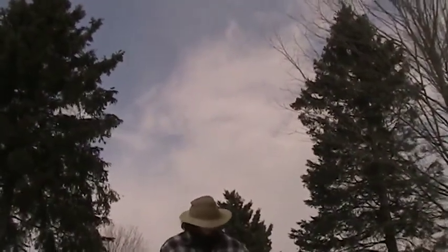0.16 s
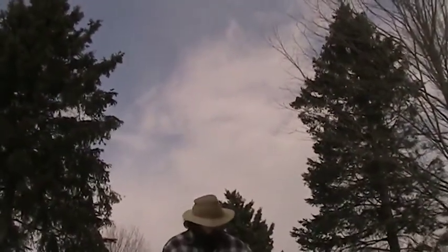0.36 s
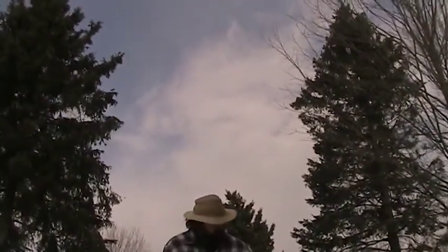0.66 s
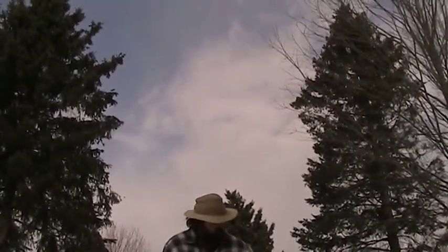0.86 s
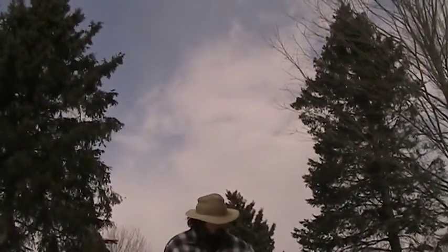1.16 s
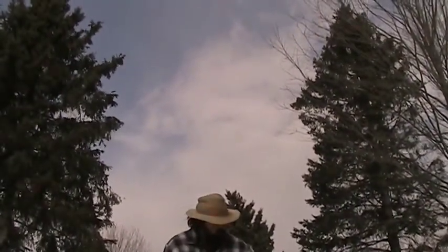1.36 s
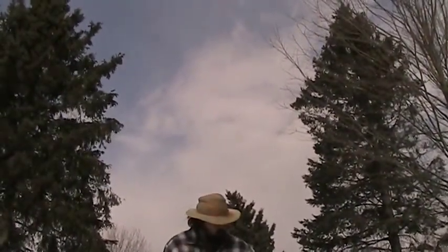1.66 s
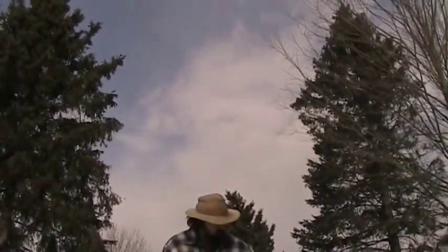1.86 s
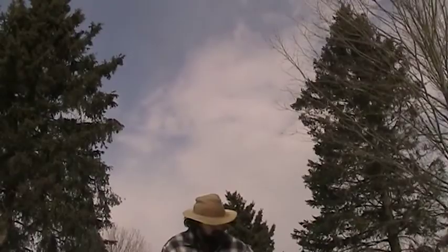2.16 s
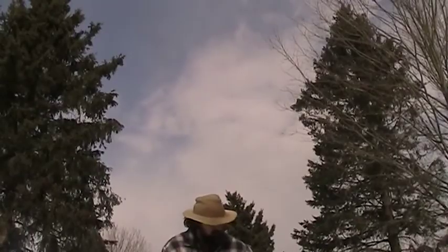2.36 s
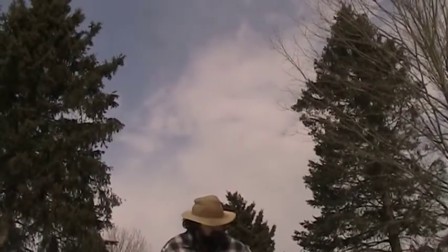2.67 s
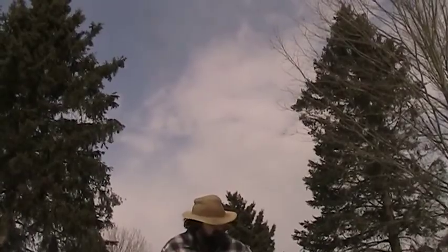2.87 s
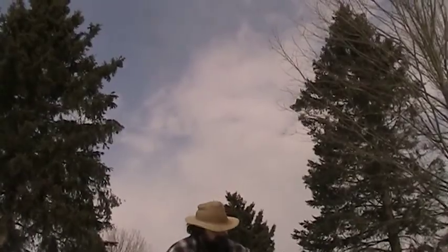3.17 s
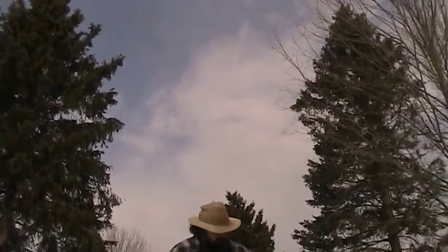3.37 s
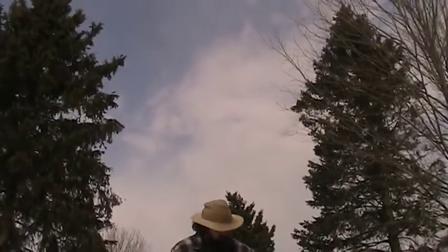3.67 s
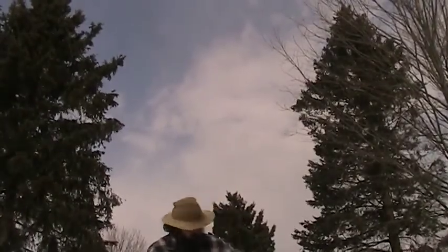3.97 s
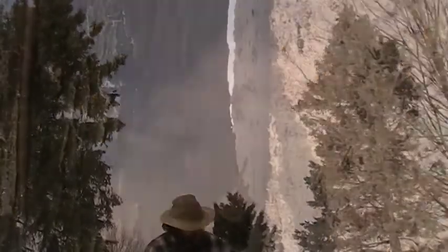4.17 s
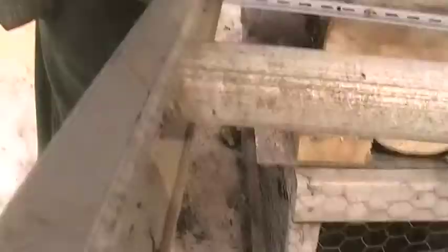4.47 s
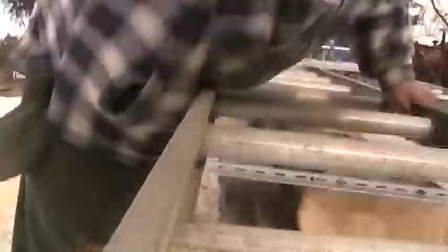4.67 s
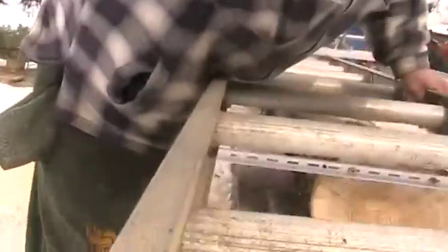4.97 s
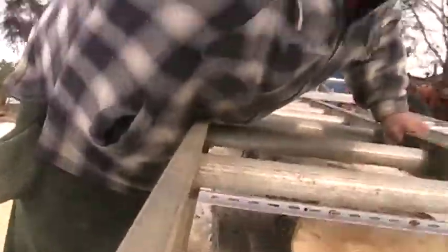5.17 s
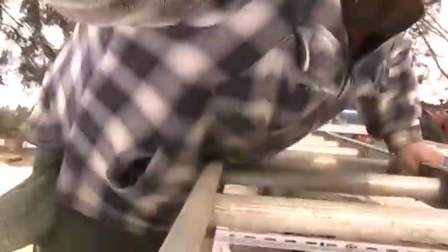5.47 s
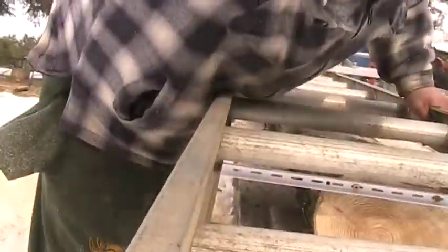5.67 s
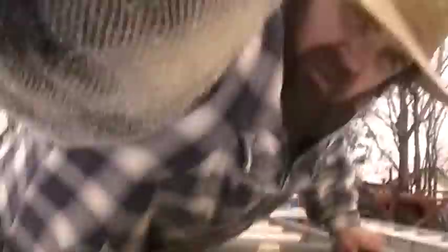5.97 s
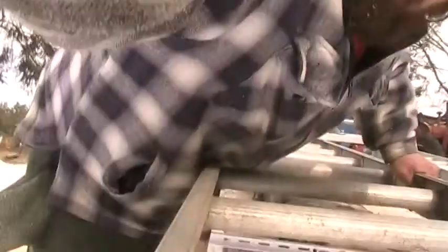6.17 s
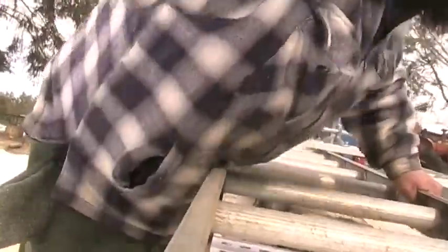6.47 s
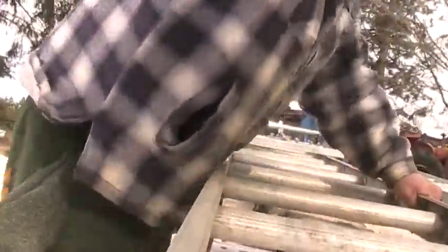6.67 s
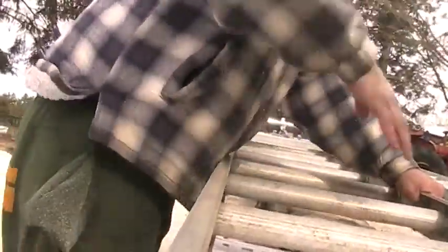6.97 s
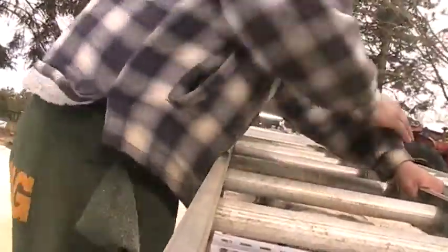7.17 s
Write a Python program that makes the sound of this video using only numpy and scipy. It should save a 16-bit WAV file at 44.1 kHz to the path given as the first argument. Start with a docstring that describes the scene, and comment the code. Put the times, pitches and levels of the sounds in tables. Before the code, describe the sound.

A two-stroke chainsaw revs up, labours through wood, is blipped several times, then putters steadily close by.

```python
"""An outdoor log mill. A two-stroke chainsaw revs up, labours in the wood, is blipped and runs down.
The scene cuts, with two short stutters, to a place right beside the saw, puttering at a steady low speed;
a dull bump and a light tick are heard. The exhaust is a source-filter system: each firing is a pulse
that excites the resonances of pipe and muffler. Chain and cooling air give broadband noise modulated
at the crank rate, and the chain drives the guide bar into resonance."""
import sys
import numpy as np
from scipy import signal
from scipy.fft import rfft, irfft, next_fast_len
from scipy.io import wavfile
from scipy.ndimage import uniform_filter1d, map_coordinates

SR = 44100
rng = np.random.default_rng(int(sys.argv[2]) if len(sys.argv) > 2 else 0)


def file_out(sig):
    """Save sig as 16-bit WAV at sys.argv[1]."""
    # one column per channel
    cols = np.atleast_2d(sig).T
    # limit, then scale
    lim = np.clip(cols, -1, 1)
    pcm = np.round(lim * 32767).astype(np.int16)
    wavfile.write(sys.argv[1], SR, pcm)


N = 322812
TIME = np.arange(N) / SR
TOP_HZ = 15800

def amp(db):
    """Decibels to amplitude ratio."""
    return 10 ** (np.asarray(db) / 20)

def unit(x):
    """Normalisation to rms 1."""
    return x / np.sqrt(np.mean(x ** 2) + 1e-20)

def steady(x):
    """Normalisation to a running rms of 1."""
    power = uniform_filter1d(uniform_filter1d(x ** 2, size=900), size=700)
    return x / np.sqrt(np.abs(power) + 1e-12)

def along(points, hz):
    """Interpolation on a logarithmic frequency axis."""
    f, v = np.transpose(points)
    return np.interp(np.log(hz + 1), np.log(f + 1), v)

def curves(rows):
    """Linear interpolation in time of each column after the first."""
    times, *columns = np.transpose(rows)
    return [np.interp(TIME, times, column) for column in columns]

def wobble(rate):
    """Smooth random modulation, rate knots a second."""
    return map_coordinates(rng.standard_normal(int(N * rate / SR) + 4), [np.arange(N) * rate / SR])

def filtered(x, response):
    """Linear filtering: the spectrum times a frequency response."""
    size = next_fast_len(N + SR // 2)
    return irfft(rfft(x, size) * response(np.fft.rfftfreq(size, 1 / SR)), size)[..., :N]

def ring(x, colour, size=4096):
    """Convolution with a minimum-phase body of the given magnitude response."""
    cepstrum = irfft(np.log(amp(along(colour, np.fft.rfftfreq(size, 1 / SR)))))
    cepstrum[1:size // 2] *= 2
    cepstrum[size // 2 + 1:] = 0
    return signal.oaconvolve(x, irfft(np.exp(rfft(cepstrum))))[:N]

def pulses(at, sizes, count=8):
    """Band-limited impulses: windowed sincs at fractional sample positions."""
    taps = at.astype(int)[:, None] + np.arange(1 - count, count + 1)
    offset = taps - at[:, None]
    shape = np.sinc(offset) * np.cos(np.pi * offset / (2 * count)) ** 2
    return np.bincount(np.clip(taps, 0, N).ravel(), (sizes[:, None] * shape).ravel(), N + 1)[:N]

def pan(x, left_db):
    """Localisation by a level difference between the channels."""
    return x * amp(np.array([[left_db], [-left_db]]) / 2)

# the long pull at full throttle, slowed by the wood: (time [s], firing rate [Hz])
PULL_SPEED = [(0.0, 158), (0.04, 244), (0.07, 301.4), (0.11, 360), (0.15, 435.6), (0.19, 453),
              (0.55, 414.2), (0.68, 391), (0.86, 335.3), (1.08, 352.5), (1.17, 346), (1.4, 357.2),
              (1.53, 306.0), (1.62, 321.5), (1.75, 313), (1.83, 338), (1.98, 321.5), (2.11, 334),
              (2.26, 319), (2.37, 342), (2.58, 368), (2.73, 406.5), (2.91, 433), (2.96, 432)]
# throttle blips: (opening time [s], closing time [s], starting rate [Hz], rate reached [Hz])
THROTTLE_BLIPS = [(3.13, 3.198, 194, 292.6), (3.254, 3.335, 266.5, 389.4), (3.606, 3.707, 185, 274.3),
                  (3.801, 3.857, 210.5, 260.6), (3.979, 4.044, 184, 255.8), (4.123, 4.159, 197.8, 208),
                  (4.259, 4.319, 169.2, 236.6)]
RELEASE_S, FADE_S, GONE_S = 2.968, 4.19, 4.49  # the pull ends; the revving starts to fade; it is gone
def crank_speed(idle_hz=110.1, final_hz=167.3):
    """Frictional decay: after the pull and each blip the firing rate sinks exponentially towards idle."""
    def sink(until, low):
        log_excess = np.log([top - idle_hz, low - idle_hz])
        return idle_hz + np.exp(np.interp(TIME, [since, until], log_excess))
    speed, = curves(PULL_SPEED)
    since, top = RELEASE_S, PULL_SPEED[-1][1]
    for opens, shuts, low, reached in THROTTLE_BLIPS:
        speed = np.where(TIME >= since, sink(opens, low), speed)
        swing = np.sin(np.pi / 2 * np.clip((TIME - opens) / (shuts - opens), 0, 1)) ** 2
        speed = np.where(TIME >= opens, low + (reached - low) * swing, speed)
        since, top = shuts, reached
    return np.where(TIME >= since, sink(GONE_S, final_hz), speed)

def throttle(lead_s=0.0059):
    """Response lag: the throttle (1 open, 0 coasting) leads the crank in each blip."""
    ahead = TIME + lead_s
    blips = sum((ahead >= opens) & (ahead < shuts) for opens, shuts, *_ in THROTTLE_BLIPS)
    held = (TIME < RELEASE_S) + blips
    return uniform_filter1d(held.astype(float), size=900)

def firings(speed, align_s=0):
    """Two-stroke cycle, one firing a turn: crank turns and firing positions [samples], one at align_s."""
    turns = np.cumsum(speed) / SR
    turns = turns - turns[int(align_s * SR)] % 1
    return turns, np.interp(np.arange(1, int(turns[-1])), turns, np.arange(N))

# the band weakened by the ground bounce, drifting as the saw moves: (time [s], frequency [Hz])
GROUND_NOTCH = [(0, 1330), (1.35, 1310), (2.3, 1109), (2.75, 1051), (3.0, 836), (3.3, 870), (3.7, 1130)]
def direct_and_bounce(at, rough):
    """Destructive interference: uneven pulses, and their reflection half a notch period later."""
    notch_hz, = curves(GROUND_NOTCH)
    ragged = rough[at.astype(int)]
    late, strong = rng.standard_normal((len(at), 2)).T
    at = at + SR * 0.00006 * ragged * late
    sizes = amp(0.81 * ragged * strong)
    delay = SR / (2 * notch_hz[at.astype(int)])
    return steady(pulses(at, sizes)), steady(pulses(at + delay, sizes))

def puffs(turns, length):
    """Turbulence: gas noise after each firing decays with a time constant of length turns."""
    return unit(rng.standard_normal(N) * np.exp(-(turns % 1) / length))

# response of the exhaust pipe: (frequency [Hz], gain [dB])
PIPE_RESPONSE = [(80, -52), (180, -16), (320, -14), (450, -8.5), (560, -0.5), (660, 1.5), (780, 3),
                 (900, -6), (1040, 2.5), (1150, -1.5), (1400, -6), (2500, -76.5)]
# strength of its note: (firing rate [Hz], level [dB])
POWER_BAND_LEVEL = [(170, -30), (260, -26), (310, -20.5), (368, -22), (425, -27), (455, -29.5)]
def exhaust_pipe(gas, speed):
    """Pipe resonance: the firings sound a low note, strongest near working speed."""
    return pan(amp(along(POWER_BAND_LEVEL, speed)) * steady(ring(gas, PIPE_RESPONSE)), left_db=5)

# response of the muffler box: (frequency [Hz], gain [dB])
MUFFLER_RESPONSE = [(400, -82.5), (900, -20), (1200, 5.5), (1400, 12.5), (1620, 14), (1780, 14.5),
                    (2050, 8), (2200, 5.5), (2400, -12), (3200, -49.5), (7000, -56)]
def muffler_bark(gas, level_db):
    """Cavity resonance: the muffler box favours the middle harmonics of the firings."""
    return pan(amp(level_db) * steady(ring(gas, MUFFLER_RESPONSE)), left_db=4.5)

# response of the muffler's tin shell: (frequency [Hz], gain [dB])
SHELL_RESPONSE = [(1200, -64.5), (2350, 0), (2650, 8), (2900, -1), (3200, 10.5), (3550, 4.5), (3850, 9),
                  (4500, -1), (6000, -11.5), (10000, -5), (16000, -39)]
def shell_rasp(gas, level_db):
    """Forced vibration: the tin shell radiates the upper harmonics."""
    return pan(amp(level_db) * steady(ring(gas, SHELL_RESPONSE)), left_db=3.4)

# modes of bar and casing: (frequency [Hz], bandwidth [Hz], distant gain [dB], close gain [dB])
METAL_MODES = [(2990, 75, 0, 7.5), (5980, 240, -3, -4), (6085, 200, 4, 9), (7700, 230, 4.5, 4.5),
               (8730, 160, 4, 6.5), (9740, 160, 6, 2), (11500, 330, 2, 0), (13300, 250, -5, 6),
               (14300, 250, 2, 6)]
# likeness of left and right: (frequency [Hz], correlation [0-1])
HISS_COHERENCE = [(60, 0.078), (300, 0.74), (1800, 1), (4000, 0.82), (9000, 0.65), (15000, 0.8)]
def hiss(colour, turns, throb, grain_db, close):
    """Amplitude modulation: chain and air noise throbs with the crank and rings the metal."""
    def response(hz):
        modes_db = sum((close_db if close else far_db) / (1 + (2 * (hz - centre) / width) ** 2)
                       for centre, width, far_db, close_db in METAL_MODES)
        angle = np.arccos(np.clip(along(HISS_COHERENCE, hz), -1, 1)) / 2
        return amp(along(colour, hz) + modes_db) * [np.cos(angle), np.sin(angle)]
    flow = 1 + throb * np.cos(2 * np.pi * (turns - 0.15))
    grain = amp(grain_db * wobble(700) + 0.8 * wobble(45))
    mid, side = filtered(flow * grain * rng.standard_normal((2, N)), response)
    treble = filtered(mid, lambda hz: (hz > 4500) & (hz < TOP_HZ))
    return np.array([mid + side, mid - side]) / np.std(treble)

def guide_bar(level_db, ring_hz=5180, width_hz=340):
    """Noise-driven resonance: the chain rattles in its groove and keeps the bar ringing."""
    rattle = (rng.standard_normal(N) + 0.15 * rng.standard_normal((2, N))) * amp(2.8 * wobble(300))
    sizzle = unit(filtered(rattle, lambda hz: 1 / (1 + ((hz - ring_hz) / width_hz) ** 2) ** 2))
    return pan(amp(level_db) * sizzle, left_db=5)

# response of the exhaust off the throttle: (frequency [Hz], gain [dB])
COAST_RESPONSE = [(100, -43), (280, -19.5), (450, -18), (650, -4.5), (850, -11), (1020, -3), (1150, -7),
                  (1450, 4.5), (1650, 2.5), (1820, 8.5), (1950, 1.5), (2200, 3), (2450, -14), (3500, -28),
                  (7000, -44)]
# prominent harmonics: (crank order [1], relative amplitude [1])
SINGING_ORDERS = [(5, 0.15), (8, .15)]
def coasting_whine(gas, turns, level_db):
    """Harmonic emphasis: two crank orders sing out over the firings in a thinner whine."""
    singing = sum(strength * np.cos(2 * np.pi * order * turns) for order, strength in SINGING_ORDERS)
    return pan(amp(level_db) * steady(ring(gas + singing, COAST_RESPONSE)), left_db=4.5)

# envelopes of the muffler bark and of the hiss: (time [s], relative level [dB])
BARK_ENVELOPE = [(0, -18), (.12, -24.5), (.2, -20.5), (.62, -21.5), (.85, -24.5), (1.38, -24.5),
                 (1.5, -22.5), (2.5, -21.5), (2.78, -17), (2.95, -18.5), (3.0, -21.5), (3.14, -16),
                 (3.35, -19), (3.65, -16.5), (4.2, -19)]
HISS_ENVELOPE = [(0, -24), (.3, -26.5), (.65, -25.5), (1.42, -22.5), (1.52, -27), (2.25, -27), (2.55, -24),
                 (3.0, -28.5), (3.45, -26), (4.02, -26.5), (4.2, -32)]
# chain and air noise from afar: (frequency [Hz], relative spectral density [dB])
FAR_AIR_SPECTRUM = [(30, -25), (150, -25), (400, -20.5), (1100, -16), (1800, 2), (2400, -4.5), (4200, 1),
                    (6000, 1.5), (8000, -5), (10000, -1.5), (12600, -4), (15800, -5.5)]
def revving_saw(work_hz=325, surge_db_per_octave=3.5, rasp_db_per_octave=13.5):
    """Superposition: speed and throttle set the balance of exhaust, rasp, hiss and bar."""
    speed, opening = crank_speed(), throttle()
    coasting = 1 - opening
    octaves = np.log2(speed / work_hz)
    above, below = np.maximum(octaves, 0), np.maximum(-octaves, 0)
    surge_db = -surge_db_per_octave * below
    bark_db = curves(BARK_ENVELOPE)[0] + surge_db + 0.89 * wobble(10)
    hiss_db = curves(HISS_ENVELOPE)[0] + 1.5 + 0.88 * wobble(14)
    rasp_db = hiss_db - 5 + rasp_db_per_octave * above - 4 * coasting + 1.2 * wobble(7)
    slack = np.clip((TIME - RELEASE_S) / 0.36, 0, 1)  # after the pull the slack chain rings the bar more
    bar_db = -41 + 8.5 * slack + surge_db + 1.44 * wobble(10)
    rough = 0.076 + 0.92 * below + 0.14 * coasting  # firing is ragged at low speed and off the throttle
    turns, at = firings(speed * (1 + 0.001496 * wobble(25)))
    direct, bounce = direct_and_bounce(at, rough)
    notched = steady(direct + 0.83 * bounce)
    pipe = exhaust_pipe(notched + 0.32 * rough * puffs(turns, length=0.41), speed)
    bark = muffler_bark(notched + 0.52 * rough * puffs(turns, length=1.0), bark_db)
    gas = steady(direct + 0.33 * bounce) + 1.14 * rough * puffs(turns, length=0.62)
    exhaust = opening * (pipe + bark) + coasting * coasting_whine(gas, turns, bark_db - 0.5)
    air = amp(hiss_db) * hiss(FAR_AIR_SPECTRUM, turns, throb=0.075, grain_db=0.5, close=False)
    return exhaust + shell_rasp(gas, rasp_db) + air + guide_bar(bar_db)

# the puttering engine: (time [s], firing rate [Hz])
PUTTER_RATE = [(4.45, 151.3), (4.57, 147.2), (4.64, 148), (4.71, 147.7), (4.9, 147.9), (4.97, 143.3),
               (5.07, 141.8), (5.35, 147.4), (5.55, 148.6), (5.65, 150.6), (5.95, 151.6), (6.11, 148.9),
               (6.28, 151.0), (6.4, 146), (6.67, 152), (6.99, 148.0), (7.07, 151.6), (7.32, 150.6)]
# its hiss and bar ring: (time [s], relative hiss level [dB], relative bar level [dB])
PUTTER_ENVELOPES = [(4.47, -27.5, -29), (4.75, -29, -40.5), (5.5, -29.5, -48), (6.03, -28, -31),
                    (6.42, -30.5, -35), (6.62, -28.5, -28.5), (7.32, -28.5, -31)]
# response of the exhaust close by: (frequency [Hz], gain [dB])
CLOSE_PIPE_RESPONSE = [(60, -41), (150, -33.5), (300, -27.5), (450, -14), (600, -13.5), (850, -4.5),
                       (1280, -1.5), (1480, 2), (1590, 5), (1700, -2), (1980, -2.5), (2450, -20),
                       (2800, -9.5), (3800, -38.5), (12000, -36)]
# chain and air noise close by: (frequency [Hz], relative spectral density [dB])
CLOSE_AIR_SPECTRUM = [(30, -22), (120, -19), (400, -0.5), (900, 4), (1900, 9.5), (2450, 0), (2850, 0.5),
                      (4000, 1), (6500, 2), (8000, -2.5), (11000, -1.5), (12300, -6), (13500, -12),
                      (15800, -9.5)]
def puttering_saw(first_pop_s=4.3712, bang_db=1, bang_late_s=0.00023, echo_s=0.001935):
    """Subharmonic modulation: every third or fourth pop is a stronger, slightly late bang."""
    speed, = curves(PUTTER_RATE)
    hiss_db, bar_db = curves(PUTTER_ENVELOPES)
    exhaust_db = -19.02 - 0.25 * (TIME - first_pop_s)
    turns, at = firings(speed * (1 + 0.002055 * wobble(18)), first_pop_s)
    late, strong = rng.standard_normal((len(at), 2)).T
    pops_per_bang = np.clip(3.1 + 0.4 * wobble(3)[at.astype(int)], 3, 4)
    bang = np.diff(np.floor(np.cumsum(1 / pops_per_bang)), prepend=0)
    at = at + SR * (bang_late_s * bang + 0.000018 * late)
    sizes = amp(bang_db * bang + 0.4 * strong)
    echo = 0.14 * pulses(at + SR * echo_s, sizes)  # a delayed copy of each pop prolongs its ring near 1.6 kHz
    gas = unit(pulses(at, sizes) + echo) + 0.08 * puffs(turns, length=0.6)
    exhaust = amp(exhaust_db) * unit(ring(gas, CLOSE_PIPE_RESPONSE))
    air = amp(hiss_db + 1) * hiss(CLOSE_AIR_SPECTRUM, turns, throb=0.13, grain_db=1.5, close=True)
    return pan(exhaust, left_db=5) + pan(air, left_db=1.5) + guide_bar(bar_db - 5.5)

# a dull bump and a light tick: (time [s], level [dB], spectral peak [Hz], 60 dB decay time [s])
KNOCK_EVENTS = [(4.434, -32.5, 130, 0.1), (6.019, -14, 4000, 0.025)]
def knocks():
    """Damped transients: bursts of band-pass noise decay exponentially."""
    out = np.zeros(N)
    for start, db, peak_hz, t60 in KNOCK_EVENTS:
        noise = unit(filtered(rng.standard_normal(N), lambda hz: hz / (hz ** 2 + peak_hz ** 2)))
        out += noise * (TIME >= start) * amp(db - 60 * np.abs(TIME - start) / t60)
    return pan(out, left_db=3)

# spans heard from beside the saw: (start [s], end [s])
CLOSE_SPANS = [(4.366, 4.3735), (4.427, 4.436), (4.449, 7.4)]
def scene():
    """Gating: the close puttering replaces the fading revving, after two short stutters."""
    gate = sum(1.0 * ((TIME >= start) & (TIME < end)) for start, end in CLOSE_SPANS)
    close = uniform_filter1d(gate, size=60)
    fade = np.clip((GONE_S - TIME) / (GONE_S - FADE_S), 0, 1)
    return (1 - close) * fade * revving_saw() + close * puttering_saw() + knocks()

def record(dry):
    """Band limiting: an ideal low-pass filter passes nothing above TOP_HZ."""
    return filtered(dry, lambda hz: hz < TOP_HZ)

dry = scene()
out = record(dry)
file_out(out)
```